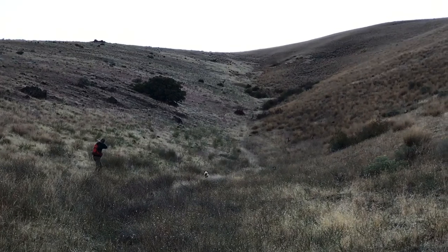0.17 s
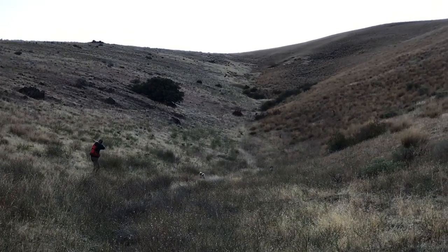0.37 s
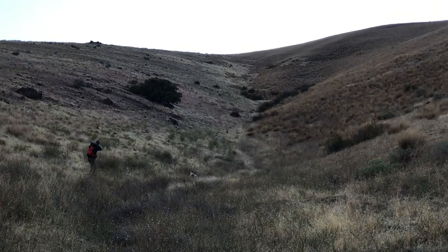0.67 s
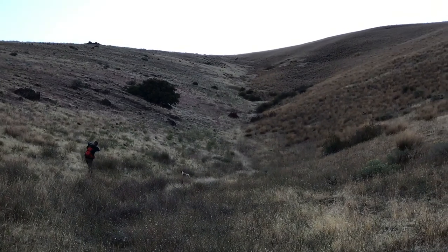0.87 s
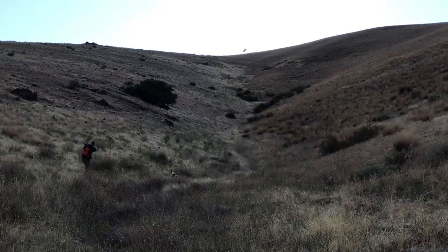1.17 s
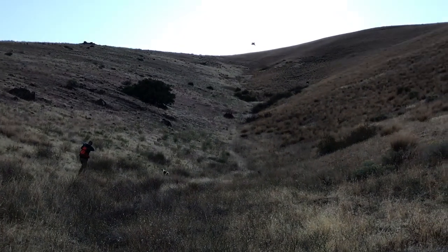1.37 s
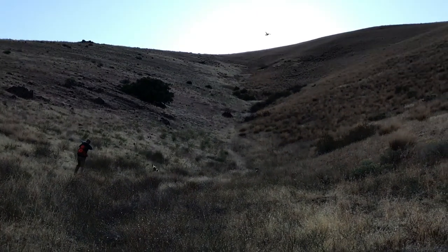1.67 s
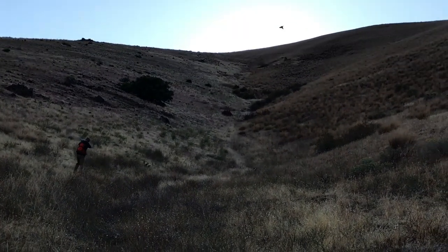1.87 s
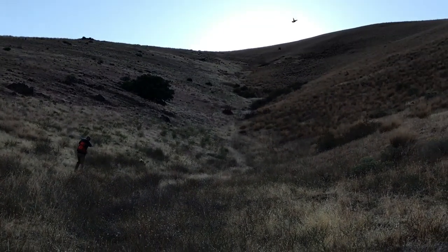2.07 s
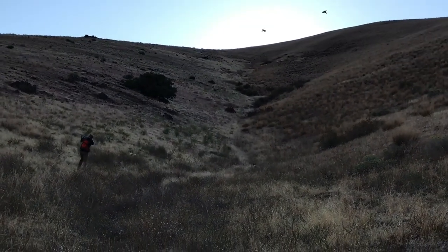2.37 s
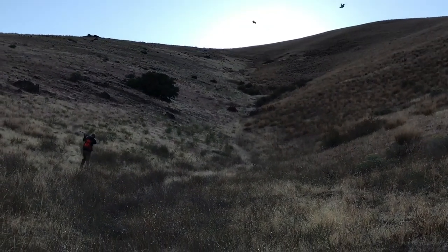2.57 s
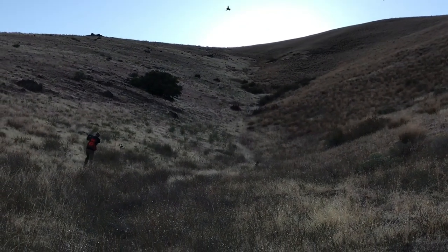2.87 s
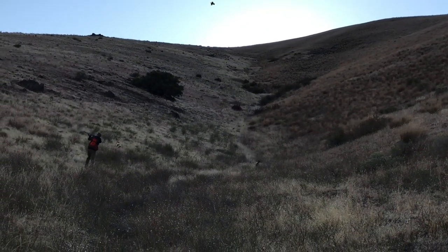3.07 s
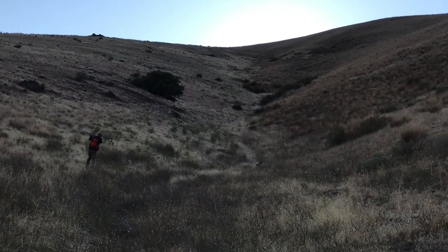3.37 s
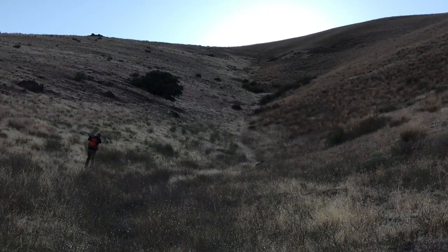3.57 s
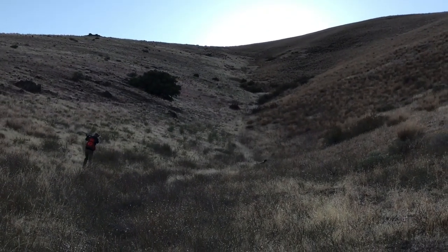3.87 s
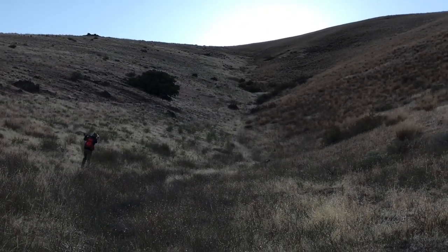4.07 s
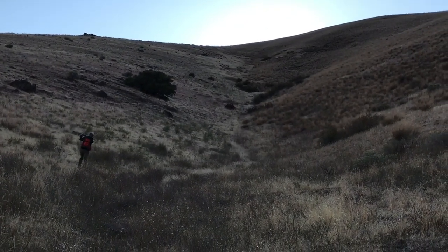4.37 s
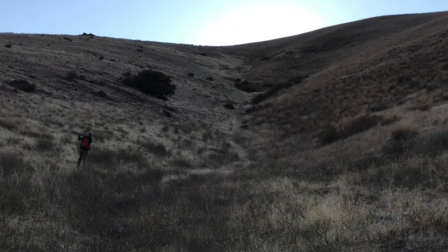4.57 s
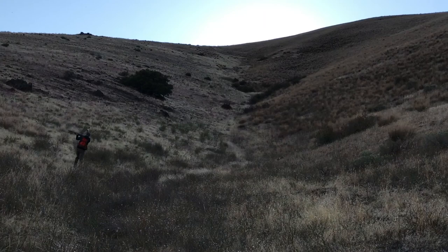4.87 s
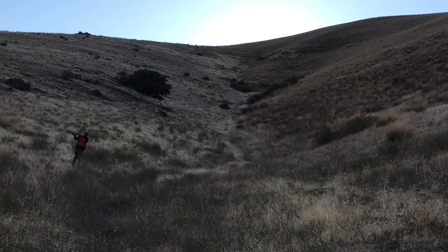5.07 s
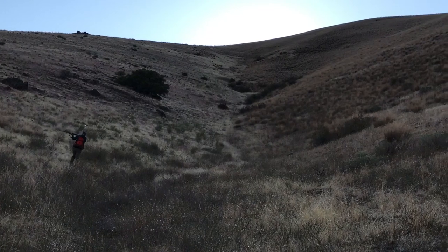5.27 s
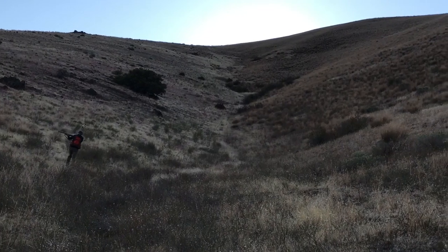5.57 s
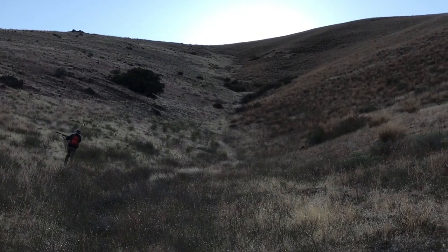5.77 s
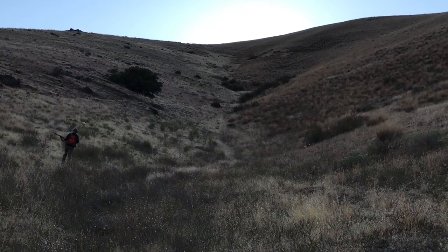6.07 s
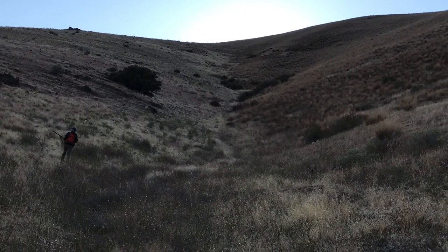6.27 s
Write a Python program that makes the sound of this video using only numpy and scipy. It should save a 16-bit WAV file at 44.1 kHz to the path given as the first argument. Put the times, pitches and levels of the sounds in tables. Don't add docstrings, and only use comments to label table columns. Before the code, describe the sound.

Three sharp shotgun blasts crack across a quiet grassy valley, each slapped back by the slopes and rolling off into distant echo over faint wind.

```python
import sys
import numpy as np
from scipy import signal
from scipy.io import wavfile

SR = 44100
rng = np.random.default_rng(int(sys.argv[2]) if len(sys.argv) > 2 else 0)


def bounce(signal):
    frames = np.transpose(np.atleast_2d(signal))
    limited = np.clip(frames, -1, 1)
    pcm = np.round(limited * 32767).astype(np.int16)
    wavfile.write(sys.argv[1], SR, pcm)


def rack_gain(trim_db):
    fader = np.asarray(trim_db, float)
    return 10 ** (fader / 20)


N = 283122
TIME = np.arange(N) / SR
EDGES = 20 * 2 ** np.arange(0, 9.3, .3)
CENTRES = np.sqrt(EDGES[1:] * EDGES[:-1])
TILT_OCTAVES = np.log2(np.maximum(CENTRES, 600) / 1500)[:, None]

# start [s], aim of the barrel [deg], grass hiss [dB], ground bloom [dB].
SHOTS = [
    (0.8115, -24.5, -21, -25),
    (2.6736, 2.5, -21, -20),
    (4.7613, 24.5, -27, -26),
]
# rolling tail [dB], its sag [dB per s], slap strength [dB].
RETURNS = [
    (-41.5, 2.5, 0),
    (-40.5, 13, -1),
    (-50.5, 7, -10.5),
]


def at_hz(points, hz):
    table = np.array(points)
    return np.interp(np.log(hz), np.log(table[:, 0]), table[:, 1])


def band_share(spectrum):
    share = rack_gain(at_hz(spectrum, CENTRES)) * np.sqrt(CENTRES)
    return share / np.sqrt(np.sum(share ** 2))


def noise_bands():
    settle = 8000
    white = rng.standard_normal((2, N + settle))
    bands = []
    for k in range(len(CENTRES)):
        band_pass = signal.butter(2, EDGES[k:k + 2], "band", fs=SR, output="sos")
        bands.append(signal.sosfilt(band_pass, white[k % 2])[settle:])
    bands = np.array(bands)
    return bands / bands.std(axis=1, keepdims=True)


def silent_bands():
    return np.zeros((len(CENTRES), N))


def add(out, s, shape):
    i = round(s * SR)
    out[..., i:i + shape.shape[-1]] += shape[..., :N - i]


def puff(length_ms, soft):
    length = max(length_ms, .3) * SR / 1000
    u = np.arange(round(max(length_ms, .3) * SR / 90)) / length
    shape = u ** max(soft, .05) * np.exp(-u)
    return shape / shape.max()


def swell(s, db, width_s, t=TIME):
    return rack_gain(db - 5 * ((t - s) / width_s) ** 2)


def hump(hz, octaves):
    return rack_gain(-6 * (np.log2(CENTRES[:, None] / hz) / octaves) ** 2)


def flicker(depth_db, rate, count):
    r = np.exp(-80 * np.pi * rate / SR)
    white = rng.standard_normal((count, N // 40 + 2000))
    slow = signal.lfilter([1], [1, -2 * r, r * r], white)[:, 1999:]
    return np.repeat(rack_gain(depth_db * slow / slow.std()), 40, axis=1)[:, :N]


def gust_db():
    # time [s], level [dB].
    gusts = [(0, -55.5), (.4, -59), (.75, -65.5), (1.5, -50.5), (2.0, -60), (2.3, -58), (2.6, -53.5),
             (3.5, -55.5), (3.9, -60), (4.7, -64), (5.5, -63), (5.8, -62), (6.02, -74.5), (6.42, -67)]
    return np.interp(TIME, *np.transpose(gusts))


def wind_rumble(gusts_db):
    # frequency [Hz], density [dB per Hz].
    rumble = [(12, -31), (20, -5), (49, -4.5), (67, -12.5), (86, -30.5), (200, -10), (260, -40),
              (440, -120)]
    return np.outer(band_share(rumble), rack_gain(gusts_db) * flicker(1.2, 1.8, count=1)[0])


def far_rustle(gusts_db):
    # frequency [Hz], density [dB per Hz].
    rustle = [(71, -40.5), (120, -15), (178, -12.5), (286, -8.5), (327, -3), (565, -0.5), (978, -9),
              (1510, -11), (1790, -7.5), (2870, -16), (8600, -28), (11000, -33), (14300, -70.5),
              (22000, -120)]
    level_db, calms_db_per_s, follows = -60.5, 0.92, .15
    gusting = follows * (gusts_db - gusts_db.mean())
    return np.outer(band_share(rustle), rack_gain(level_db - calms_db_per_s * TIME + gusting))


def engine_thrum():
    # time [s], level [dB], half width [s].
    drifts = [
        (0.05, -55.5, 0.11),
        (.5, -58.5, .25),
        (1.45, -72, 0.29),
        (2.402, -56.5, 0.15),
        (3.2, -57, 0.47),
        (5.802, -77.5, .6),
    ]
    beats_per_s, peak_s, eases = 10.33, 2.07, .176
    since_peak = TIME - peak_s
    turns = beats_per_s * since_peak + eases * np.minimum(since_peak, 0) ** 2
    beats = 0.16 + .5 * (.5 + .5 * np.cos(2 * np.pi * turns)) ** 3.6
    return hump(450, octaves=0.31) * sum(swell(*row) for row in drifts) * beats


def grass_ticks():
    # time [s], peak [dB].
    ticks = [(0.0856, -55), (0.255, -52), (0.2706, -50), (0.291, -51), (0.3132, -42), (0.326, -47),
             (0.342, -51), (0.401, -51), (0.5482, -51), (0.5957, -49.5), (1.82, -51.5), (2.178, -51),
             (2.5553, -48.5), (3.4664, -54), (4.457, -53), (6.2907, -47.5), (6.313, -59)]
    envelope = silent_bands()
    for s, db in ticks:
        add(envelope, s, rack_gain(db - 16) * hump(4600, octaves=.95) * puff(1.3, soft=1.0))
    return envelope


def bird():
    # start [s], length [s], level [dB], lowest pitch [Hz], rise [Hz].
    notes = [
        (.424, .018, -61, 1950, 420),
        (.441, .036, -54, 1730, 520),
        (.51, .048, -66, 1900, 30),
        (5.978, .018, -68, 1850, 30),
        (6.183, .018, -68, 1880, 30),
    ]
    dip = .4
    out = np.zeros(N)
    for s, length, db, low_hz, rise_hz in notes:
        u = np.linspace(0, 1, round(length * SR))
        pitch_hz = low_hz + rise_hz * ((u - dip) / (1 - dip)) ** 2
        phase = 2 * np.pi * np.cumsum(pitch_hz) / SR
        tone = np.sin(phase) + rack_gain(-12) * np.sin(2 * phase) + rack_gain(-24) * np.sin(3 * phase)
        add(out, s, rack_gain(db) * np.sin(np.pi * u) * tone)
    return out


def blast_colour():
    # frequency [Hz], density [dB per Hz].
    blast = [(120, -26), (200, -13), (336, 0), (625, -2.5), (703, -20.5), (832, -3), (1380, -4.5),
             (1990, -3), (4160, -10), (8700, -18.5), (11000, -59), (14300, -61.5), (22000, -120)]
    return band_share(blast)[:, None]


def air_loss_db(travel_s):
    return -12.5 * np.outer((CENTRES / 4000) ** 2.654, travel_s)


def charge_and_cracks():
    # delay [s], peak [dB], tilt [dB per octave], length [ms], share of the hiss swing.
    cracks = [
        (-.0388, -29, -1, 1.4, -0.05),
        (-.0197, -36.5, -5.5, 2.4, 2),
        (-.0064, -21.5, 0.1, 8, -0.56),
        (.0046, -19, 1.8, 1.5, 5),
        (0.0189, -20.5, 1, 1.1, 0.6),
    ]
    lead_s, flight_db = .0388, -55
    bright, envelope = blast_colour(), silent_bands()
    mean_hiss_db = np.mean(SHOTS, axis=0)[2]
    flight = np.outer(bright, np.full(round(.036 * SR), rack_gain(flight_db)))
    for start, _, hiss_db, _ in SHOTS:
        add(envelope, start - lead_s, flight)
        for delay, db, tilt_db, length_ms, share in cracks:
            level_db = db - 10 + share * (hiss_db - mean_hiss_db) + tilt_db * TILT_OCTAVES
            add(envelope, start + delay, bright * rack_gain(level_db) * puff(length_ms, soft=.7))
    return envelope


def fronts():
    # time [s], peak [dB], positive phase [ms].
    shock_fronts = [(.81004, -14, .08), (.81092, -7, .08), (.81166, -4, .2), (.81896, -7, .12),
                    (2.67275, -12, .08), (2.67358, -4, .12), (2.6745, -5, .4), (2.68172, -6, .75),
                    (4.76098, -10, .08), (4.76172, 0, .1), (4.76318, -3, .12), (4.7697, -11, 1.4)]
    out = np.zeros(N)
    for s, db, phase_ms in shock_fronts:
        within_sample = (s * SR % 1) / SR
        u = np.maximum(TIME[:900] - within_sample, 0) * 1000 / phase_ms
        add(out, s, rack_gain(db) * (u > 0) * (1 - u) * np.exp(-u * .45))
    return signal.sosfilt(signal.butter(1, 300, "high", fs=SR, output="sos"), out)


def grass_hiss_and_bloom():
    hiss_t60_s, hiss_rise_s = .26, .005
    bloom_t60_s, bloom_rise_s = .25, .035
    t = TIME[:round(.5 * SR)]
    bright, envelope = blast_colour(), silent_bands()
    for start, _, hiss_db, bloom_db in SHOTS:
        hiss = rack_gain(hiss_db - 60 * t / hiss_t60_s + air_loss_db(t)) * (1 - np.exp(-t / hiss_rise_s))
        add(envelope, start - .001, bright * hiss)
        bloom = rack_gain(bloom_db - 60 * t / bloom_t60_s) * (1 - np.exp(-(t / bloom_rise_s) ** 2))
        add(envelope, start, hump(694, octaves=.33) * bloom)
    return envelope


def pushes():
    # time [s], peak [dB], rise [s].
    low_pushes = [
        (.8158, -13.5, .002),
        (1.1745, -27.5, .004),
        (2.6795, -13.5, .0015),
        (3.0365, -31, .004),
        (4.768, -16, .001),
        (5.1285, -37, .004),
    ]
    hz, extra_cycles, glide_s, fade_s = 46, .36, .005, .022
    out, t = np.zeros(N), TIME[:4000]
    cycles = hz * t + extra_cycles * (1 - np.exp(-(t / glide_s) ** 2))
    swing = np.sin(2 * np.pi * cycles) * np.exp(-(t / fade_s) ** 2)
    for s, db, rise_s in low_pushes:
        add(out, s, rack_gain(db) * swing * (1 - np.exp(-t / rise_s)))
    return out


def roll_db(t, level_db, sag_db):
    near_bank_db, near_bank_s = 5, 0.026
    ridge_s, fall_s, drop_db, beyond_db_per_s = 0.58, 0.4, 14.5, 10
    near = near_bank_db * np.exp(-np.maximum(t - .09, 0) / near_bank_s)
    plateau = level_db - sag_db * np.minimum(t, ridge_s)
    past = np.maximum(t - ridge_s, 0)
    drop = drop_db * np.minimum(past / fall_s, 1)
    beyond = beyond_db_per_s * np.maximum(past - fall_s, 0)
    return plateau + near - drop - beyond


def rolling_tail():
    # frequency [Hz], density [dB per Hz].
    slopes = [(18, -37), (30, -5.5), (77, -0.5), (146, -13.5), (392, -3.5), (477, -6), (626, -10.5),
              (953, -15.5), (1900, -14), (4090, -19), (6880, -25.5), (11000, -49), (14300, -77),
              (22000, -120)]
    dull, envelope = band_share(slopes)[:, None], silent_bands()
    t = TIME[:round(1.5 * SR)]
    for (start, *_), (level_db, sag_db, _) in zip(SHOTS, RETURNS):
        level = rack_gain(roll_db(t, level_db, sag_db) + air_loss_db(t - .2))
        add(envelope, start, dull * level * np.minimum(t / 0.057, 1))
    return envelope * flicker(2.7, 25, count=len(CENTRES)) * flicker(2.3, 80, count=1)


def slaps():
    # delay [s], peak on the barrel's axis [dB],
    # bearing [deg], tilt [dB per octave], length [ms].
    echoes = [(0.12, -32.5, -35, 0.5, 7.1), (0.174, -31.5, 7, 1.5, 2.4), (0.216, -37, -8, -10.5, 2.4),
              (0.2784, -33, -2, -2.5, 5.3), (0.286, -28, 50, 1.5, 4.5), (.311, -24, 28, -3, 5),
              (0.342, -29, 35, -8.5, 4.1), (0.3569, -17, -1.5, -1.3, 4.2), (0.373, -30, 14, -1.5, 6),
              (0.417, -42, -11, 11, 1.3), (0.447, -53, -1, 16, 2.2), (.4665, -24.5, 0.5, 3, 2.4),
              (0.491, -26.5, -18, 3, 3.7), (0.51, -25.5, -52, 2, 4.1), (0.526, -33.5, 16, -3, 5.3),
              (.587, -35, -23, -2, 3.5), (.648, -54, -28, 13.5, 14), (0.667, -33, 9, -0.5, 7.5),
              (.682, -29.5, -28, -4.5, 9), (.690, -29, 34, -2, 9.1), (0.733, -44, -42, 15, 0.86),
              (0.789, -58, -5, 11, 10), (.831, -43, -44, 11, 3), (0.853, -33.5, 39, -1, 5.3)]
    lobe_db, lobe_deg = 9, 32
    swing_s_per_deg = 4.5e-5
    answers = []
    for (start, aim, *_), (*_, slap_db) in zip(SHOTS, RETURNS):
        for delay, db, bearing, tilt_db, length_ms in echoes:
            off_axis_db = lobe_db * ((bearing - aim) / lobe_deg) ** 2
            s = start + delay + swing_s_per_deg * aim
            answers.append((s, delay, db + slap_db - off_axis_db, tilt_db, length_ms))
    return answers


def slap_echoes():
    patch_depth_db, low_hz = 4.5, 420
    colour = blast_colour() * (1 + 1.28 * hump(590, octaves=0.24))
    colour = colour * np.minimum(CENTRES[:, None] / low_hz, 1) ** 2
    answers, envelope = slaps(), silent_bands()
    patches_db = patch_depth_db * rng.standard_normal((len(answers), len(CENTRES), 1))
    for (s, delay, db, tilt_db, length_ms), patch_db in zip(answers, patches_db):
        level_db = db - 9.5 + patch_db + tilt_db * TILT_OCTAVES + air_loss_db(delay)
        add(envelope, s - .0015, colour * rack_gain(level_db) * puff(length_ms, soft=1.0))
    return envelope


def glints(shocks):
    per_s, glint_db, slap_glint_db = 480, -4.5, -18
    draws = rng.random((3, N))
    present = draws[0] < per_s / SR
    sizes = present * rack_gain(-5.0 * np.log(draws[1] + 0.0039)) * np.sign(draws[2] - .5)
    answers, faces = slaps(), np.zeros(N)
    facets = rng.random((len(answers), 2, 3))
    for (s, _, db, _, length_ms), (when, size) in zip(answers, facets):
        spots = ((s + when * length_ms / 500) * SR).astype(int)
        faces[spots] = rack_gain(db + slap_glint_db) * (2 * size - 1)
    out = np.zeros(N)
    for (start, *_), (level_db, sag_db, _) in zip(SHOTS, RETURNS):
        t = TIME - start
        returns = sizes * rack_gain(roll_db(t, level_db, sag_db) + glint_db) + faces
        returns = returns * (t > .09) * (t < 1.2)
        first = round((start - .002) * SR)
        out += signal.fftconvolve(returns, shocks[first:first + 600])[:N]
    return signal.sosfilt(signal.butter(2, 3000, fs=SR, output="sos"), out)


def far_hills():
    # time [s], level [dB], half width [s], centre [Hz].
    far_returns = [
        (2.6, -57, .22, 808),
        (3.45, -66.5, .25, 822),
        (3.9, -62, 0.225, 976),
        (3.92, -63.5, 0.039, 1900),
        (4.58, -66.5, .08, 706),
        (6.4, -65, 0.18, 850),
    ]
    shape = 0
    for s, db, width_s, hz in far_returns:
        shape = shape + hump(hz, octaves=0.16) * swell(s, db + 1.0, width_s, TIME[::40])
    return np.repeat(shape, 40, axis=1)[:, :N] * flicker(1.3, 22, count=len(CENTRES))


def buffets():
    # time [s], level [dB].
    air_puffs = [
        (6.107, -56.5),
        (6.325, -51),
    ]
    envelope = silent_bands()
    for s, db in air_puffs:
        add(envelope, s, rack_gain(db - 6) * hump(62, octaves=.65) * puff(7, soft=1.5))
    return envelope


def ground_dip(field):
    return field - 0.76 * signal.lfilter(*signal.iirpeak(157, 2.5, fs=SR), field)


def scene():
    gusts_db = gust_db()
    distance = (far_rustle(gusts_db) + engine_thrum()) * flicker(1.7, 5, count=len(CENTRES))
    background = wind_rumble(gusts_db) + distance + grass_ticks() + buffets()
    scattered = charge_and_cracks() + grass_hiss_and_bloom() + rolling_tail() + slap_echoes() + far_hills()
    noise = np.sum(np.hypot(scattered, background) * noise_bands(), axis=0)
    shocks = fronts()
    field = glints(shocks) + pushes() + noise
    return (shocks + ground_dip(field) + bird())[None]


def low_pass(x):
    return signal.sosfilt(signal.butter(12, 11280, fs=SR, output="sos"), x)


def record(dry):
    rounded = .8 * np.tanh(dry / .8)
    steep_cut = signal.cheby2(16, 48, 11300, fs=SR, output="sos")
    return low_pass(signal.sosfilt(steep_cut, rounded))


dry = scene()
out = record(dry)
bounce(out)
```